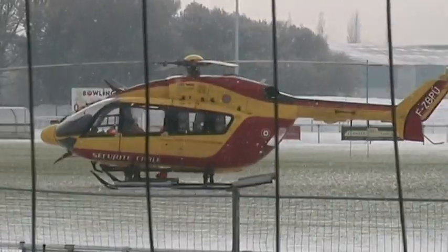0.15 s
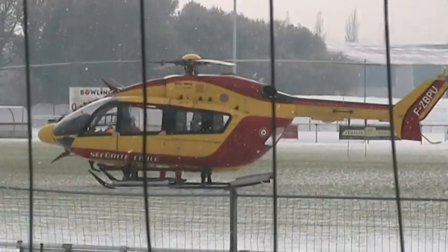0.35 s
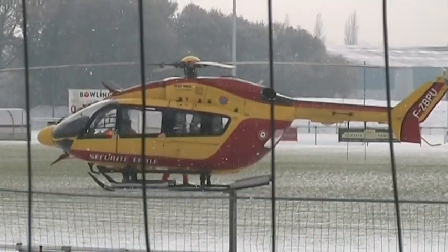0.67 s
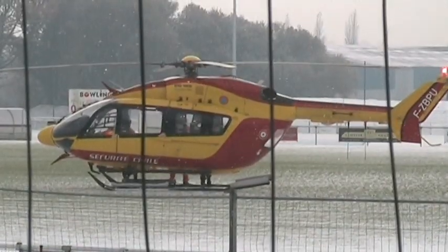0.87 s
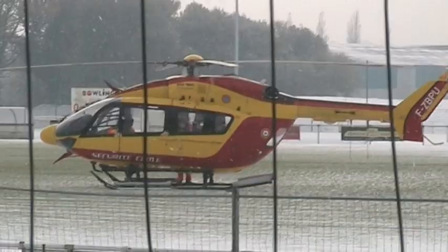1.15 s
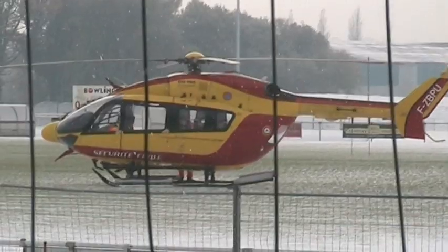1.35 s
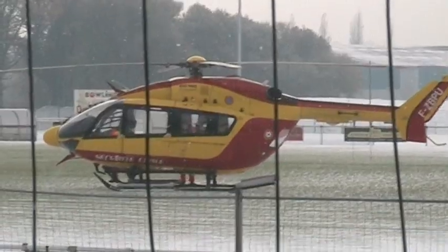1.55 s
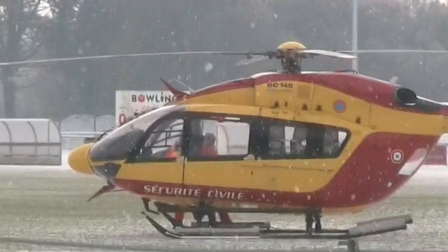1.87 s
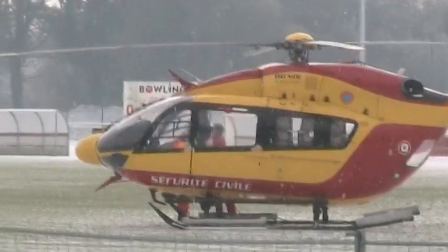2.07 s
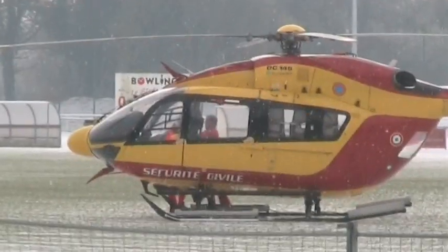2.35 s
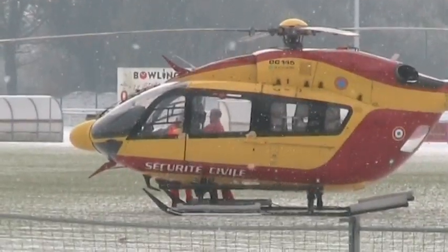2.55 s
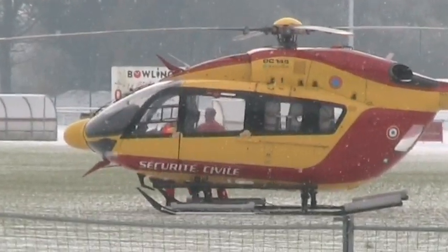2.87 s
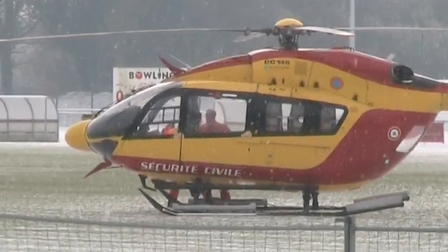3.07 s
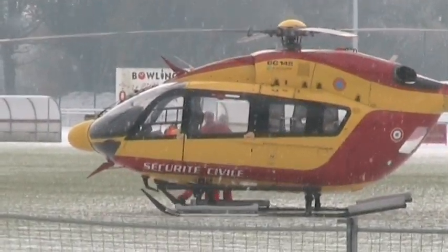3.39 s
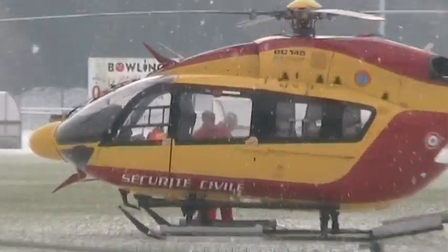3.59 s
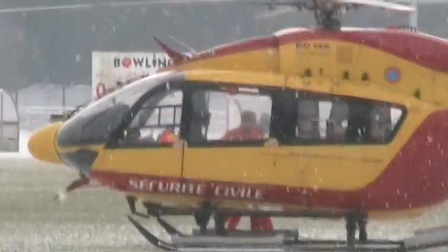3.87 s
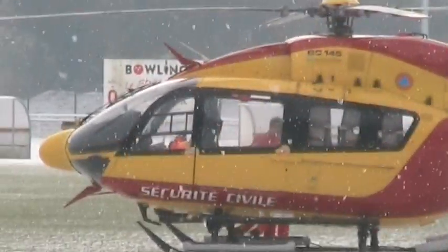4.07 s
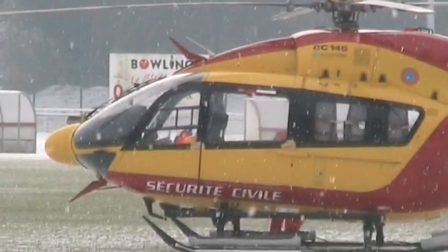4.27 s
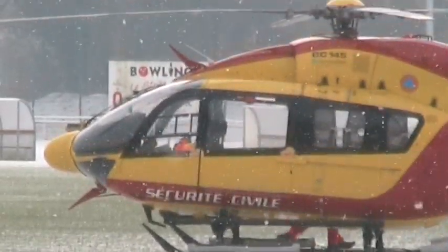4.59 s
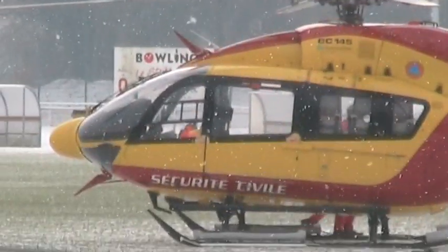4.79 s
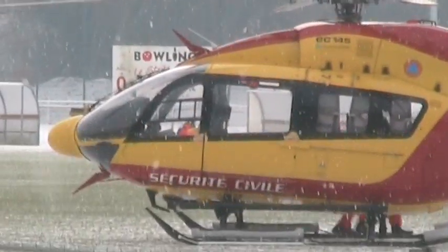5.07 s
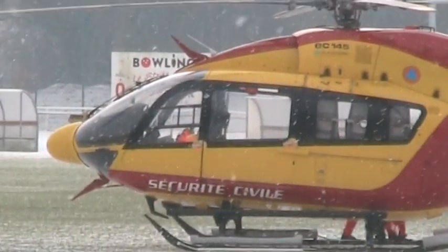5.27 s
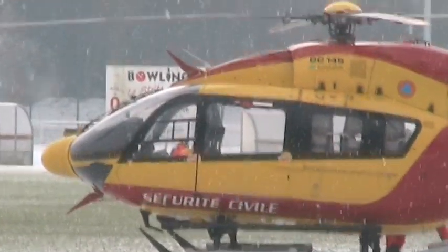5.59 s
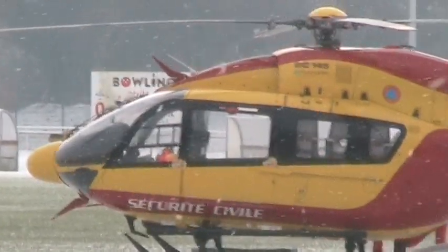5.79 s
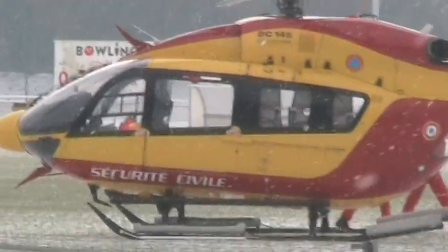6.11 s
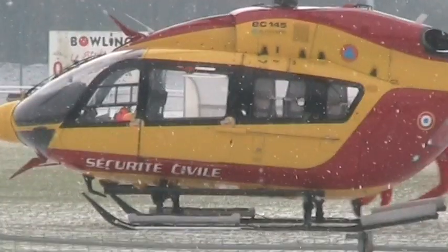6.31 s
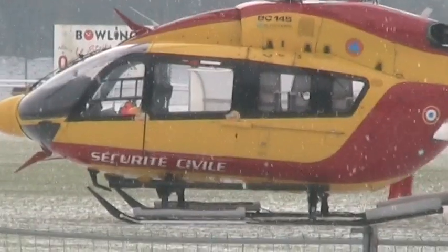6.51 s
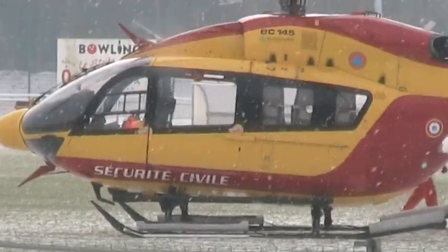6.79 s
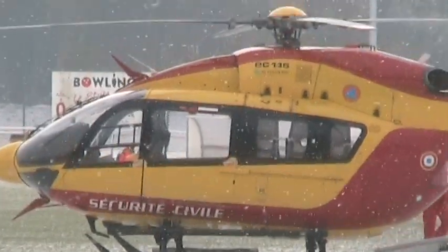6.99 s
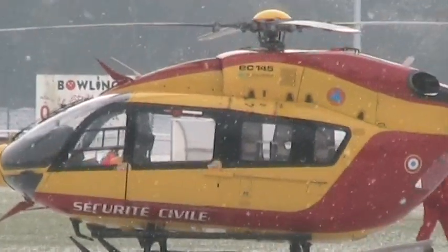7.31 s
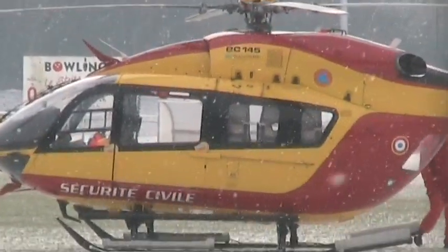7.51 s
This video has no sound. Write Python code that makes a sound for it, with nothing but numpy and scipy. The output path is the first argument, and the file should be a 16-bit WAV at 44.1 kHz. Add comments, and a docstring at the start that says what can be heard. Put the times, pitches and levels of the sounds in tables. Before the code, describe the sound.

Outdoors, an idling helicopter gives a low, growing tail-rotor hum with exhaust rush and a thin turbine whine, while a sharp knock and dry clicks come from the camera. Just before two seconds a hard cut drops the helicopter to faint; the tape camcorder's own buzz and surging high whistle come forward over a low steady hum, with a few soft knocks and rustles.

```python
"""A helicopter idles on a field, heard through a tape camcorder whose own mechanism is audible, in two shots.
First the tail rotor's harmonic hum swells over exhaust rush, filtered noise, and a thin whine of turbine
partials. At 1.744 s a hard cut makes the helicopter much fainter: the head drum's pulse-train buzz comes
forward over a low hum of sines, its whistle surging and sagging through a fixed resonance of changing strength.
Modal knocks, noise-burst clicks, one ping and soft bands of noise are scattered across both shots."""
import sys
import numpy as np
from scipy import signal
from scipy.fft import rfft, irfft, next_fast_len
from scipy.io import wavfile
from scipy.ndimage import uniform_filter1d

SR = 44100
rng = np.random.default_rng(int(sys.argv[2]) if len(sys.argv) > 2 else 0)


def digitize_waveform(pressure):
    """Quantize a signal to 16-bit integers and store it at the path in sys.argv[1].

    Rows of a 2-D input are taken as channels; values are limited to [-1, 1].
    """
    field = np.atleast_2d(pressure).T
    bounded = np.clip(field, -1, 1)
    quanta = np.round(bounded * 32767).astype(np.int16)
    wavfile.write(sys.argv[1], SR, quanta)


N = 337365
TIME = np.arange(N) / SR
FREQS = np.maximum(np.arange(N // 2 + 1) * SR / N, 1)
CUT_S = 1.744  # where the wide shot gives way to the close one
HEAD_HZ = 300  # head contacts per second
TOP_HZ = 15200  # upper band limit


def undb(db):
    """Logarithmic level: decibels to amplitude gain."""
    return 10 ** (np.asarray(db) / 20)


def curves(rows):
    """Linear interpolation in time of each column of a control table."""
    seconds, *columns = np.transpose(rows)
    return [np.interp(TIME, seconds, column) for column in columns]


def spectra(rows, hz=FREQS):
    """Interpolation on a logarithmic frequency axis of each column of a table."""
    points, *columns = np.transpose(rows)
    return [np.interp(np.log(hz), np.log(points), column) for column in columns]


def colour(x, gain):
    """Linear filtering: every frequency is multiplied by its own gain."""
    size = next_fast_len(N)
    hz = np.arange(size // 2 + 1) * SR / size
    return irfft(rfft(x, size) * np.interp(hz, FREQS, gain), size)[:N]


def noise():
    """White noise of unit power per Hz."""
    return rng.standard_normal(N) * np.sqrt(SR / 2)


def walk(rate):
    """Slow random modulation: steps at the given rate in Hz, smoothed, with a spread near 1."""
    k = max(int(SR / rate), 1)
    held = np.repeat(rng.standard_normal(N // k + 2), k)
    steps = uniform_filter1d(held, k)
    return uniform_filter1d(steps, k)[:N] / np.std(steps)


def tone(hz, db, waver=0):
    """Phase modulation: a sine of given rms level and random start, its phase bent by waver in radians."""
    phase = 2 * np.pi * (np.cumsum(hz + np.zeros(N)) / SR + rng.random())
    return np.sqrt(2) * undb(db) * np.sin(phase + waver)


def decay(t, t60):
    """Exponential damping: 60 dB lost in t60 seconds."""
    return np.exp(-np.log(1000) * t / t60)


def burst(t, low_hz, high_hz, t60):
    """Damped band noise: a sharp start and an exponential decay."""
    edges = np.clip([low_hz, high_hz], 20, .45 * SR)
    band = signal.butter(4, edges, "band", fs=SR, output="sos")
    grit = signal.sosfilt(band, rng.standard_normal(len(t)))
    return grit / np.std(grit) * decay(t, t60)


def add(out, x, s, db, pan_db):
    """Superposition: a short sound is mixed in at its time, level and side."""
    start = int(s * SR)
    sides_db = np.array([[pan_db], [-pan_db]]) / 2
    out[:, start:start + len(x)] += x * undb(db + sides_db)


def place(x, pan_db, lead_ms):
    """Stereo localisation: a level and an arrival-time difference, left relative to right."""
    late = np.interp(TIME - lead_ms / 1000, TIME, x)
    return np.array([x * undb(pan_db / 2), late * undb(-pan_db / 2)])


# Exhaust rush and open air. Each row: frequency in Hz, spectral level common to both ears in dB,
# spectral level differing between the ears in dB, both before swell and trim.
RUSH_WIDE = [(20, -88, -82), (55, -72.5, -68), (108, -61.5, -63), (286, -66, -66.5), (423, -71, -77.5),
             (1115, -69.5, -77.5), (1830, -69, -89), (2520, -73, -96), (2970, -71.5, -94),
             (3950, -75.5, -87), (4400, -81.5, -106), (5200, -85, -101), (9050, -108, -108),
             (12800, -125, -125)]
RUSH_CLOSE = [(18, -95, -93), (49.7, -68.5, -65), (100, -69.5, -64), (261, -71, -71), (310, -77, -73.5),
              (363, -71, -75), (435, -77, -77.5), (828, -74.5, -85.5), (880, -82, -83.5),
              (1310, -78.5, -85), (2400, -86, -92), (3550, -86.5, -81), (7960, -108, -108),
              (10800, -125, -125)]


def rush(table, swell_db, flutter_db):
    """Turbulence noise: exhaust straight ahead flutters in the downwash, within diffuse outdoor noise."""
    mid_db, side_db = spectra(table)
    strength = undb(swell_db - np.mean(swell_db) + flutter_db * walk(25))
    jet = colour(noise(), undb(mid_db)) * strength
    air = colour(noise(), undb(side_db))
    return np.array([jet + air, jet - air])  # opposite signs make the air diffuse


def low_hum(partials, lead_ms):
    """Superposition of low, nearly steady sines, a little stronger on the right and earlier on the left."""
    return place(partials, pan_db=-2.0, lead_ms=lead_ms)


# Soft rustles, rumbles and thin squeaks, and a low thump as the scene changes at 1.75 s. Each row: centre time
# in seconds, spread in seconds, # peak level in dB per Hz, centre frequency in Hz, width in Hz.
SWISHES = [(1.32, 0.075, -85, 6100, 497), (1.70, 0.058, -60, 290, 170), (1.75, 0.018, -58, 35, 30),
           (1.757, .014, -69, 520, 420), (4.35, .22, -68, 5622, 10), (4.85, 0.073, -75, 640, 160),
           (5.1, .15, -68, 38, 15), (5.55, .06, -70, 720, 120), (6.0, 0.28, -69, 45, 20),
           (6.2, .16, -73.5, 650, 200), (6.78, .12, -78, 4630, 80), (6.9, .22, -64, 5700, 10),
           (7.40, .025, -80, 4100, 600), (7.41, .03, -76, 5400, 250), (7.44, .05, -60, 4045, 25),
           (7.5, .06, -68, 5179, 16)]


def swishes():
    """Band-limited noise under a Gaussian envelope: each swish comes and goes."""
    total = 0
    for s, spread_s, db, hz, width_hz in SWISHES:
        band = colour(noise(), np.exp(-((FREQS - hz) / width_hz) ** 2))
        total = total + band * undb(db) * np.exp(-((TIME - s) / spread_s) ** 2)
    return total


# Dry clicks, and a broad snap as the scene changes at 1.7425 s. Each row: start in seconds, level in dB, low
# edge in Hz, high edge in Hz, # t60 in seconds, left minus right in dB.
CLICKS = [(0.0844, -24.5, 2600, 4400, 0.025, -2), (0.2505, -27, 2950, 3300, 0.033, -2),
          (0.675, -37, 4700, 6650, 0.022, 0), (0.959, -28, 3900, 4250, .022, -2),
          (1.7425, -34, 3000, 14000, 0.0051, -2), (2.2194, -36, 5100, 5700, .02, 0),
          (2.4508, -27.5, 5300, 6500, 0.024, 2), (3.6295, -32, 3350, 3900, .024, 0),
          (3.6300, -38, 4850, 5100, .025, 0)]
# Modes of the small part that pings. Each row: frequency in Hz, relative level in dB, t60 in seconds.
PING_MODES = [(3990, 0, 0.042), (5790, -16, .035), (6130, -14, 0.031)]
PING_S, PING_DB, PING_PAN_DB = 0.6748, -20, -5


def ticks(rise_s):
    """Impulsive excitation: dry clicks of damped noise, and one small hard part that rings in its modes."""
    out = np.zeros((2, N))
    t = TIME[:SR // 5]
    for s, db, low_hz, high_hz, t60, pan_db in CLICKS:
        add(out, burst(t, low_hz, high_hz, t60), s, db, pan_db)
    ping = sum(undb(db) * np.sin(2 * np.pi * hz * t) * decay(t, t60) for hz, db, t60 in PING_MODES)
    add(out, ping * (1 - np.exp(-t / rise_s)), PING_S, PING_DB, PING_PAN_DB)
    return out


# What the camera body rings with when knocked. Each row: frequency in Hz, relative level in dB, t60 in seconds.
BODY_MODES = [(470, -6, .025), (682, -3, 0.03), (945, -3.5, 0.023), (1290, -0.5, 0.025), (1570, -12, 0.021),
              (2120, -3, 0.016), (2800, -5, .016), (3950, 9, 0.021)]
# Handling knocks. Each row: start in seconds, level in dB, pitch the contact favours in Hz,
# spread in octaves, left minus right in dB.
KNOCKS = [(0.0847, -11.5, 1250, 0.97, -7.5), (0.0872, -24, 1400, 0.94, -1), (1.709, -21, 1300, 1.1, -3),
          (1.75, -16.5, 790, 0.64, 4), (3.474, -32, 1050, 0.56, 0), (3.6258, -23, 790, 0.6, 9),
          (3.6302, -24.5, 1200, 0.58, -2), (3.9724, -33, 850, 0.65, 0), (4.2104, -31.5, 890, 0.53, 0)]


def knocks(crack_db, crack_t60, rise_s):
    """Modal excitation: each knock rings the body's modes around the pitch its contact favours."""
    out = np.zeros((2, N))
    t = TIME[:SR // 5]
    for s, db, bright_hz, octaves, pan_db in KNOCKS:
        ring = 0
        for k, (hz, mode_db, t60) in enumerate(BODY_MODES):
            favour = np.exp(-(np.log2(hz / bright_hz) / octaves) ** 2)
            sign = (-1) ** k  # neighbouring modes start in opposition
            ring = ring + sign * undb(mode_db) * favour * np.sin(2 * np.pi * hz * t) * decay(t, t60)
        crack = burst(t, bright_hz / 2 ** octaves, bright_hz * 2 ** octaves, crack_t60)
        knock = (ring + undb(crack_db) * crack) * (1 - np.exp(-t / rise_s))
        add(out, knock, s, db, pan_db)
    return out


# Tape rubbing on the drum. Each row: frequency in Hz, wide-shot spectral level in dB,
# close-shot spectral level in dB, both before trim.
TAPE = [(1500, -104, -104), (3000, -93, -95), (4150, -88, -92), (4470, -87, -81.5), (5020, -96, -92),
        (5170, -99, -83.5), (6590, -80, -82), (7200, -90.5, -88.5), (8740, -87.5, -80), (9420, -88.5, -95),
        (10600, -94, -103), (11100, -91, -83), (11560, -108, -95), (12500, -112, -112), (14960, -108, -111)]


def tape_rub(db, slap_share, ring_share, count=2400):
    """Friction noise: hiss and a thicket of thin tones from the turning parts flare at each head contact."""
    gate = 1 + slap_share * np.exp(-(TIME * HEAD_HZ % 1) / 0.18)
    hiss = noise() * gate / np.sqrt(np.mean(gate ** 2))
    lines = np.zeros(len(FREQS), complex)
    where = (rng.uniform(2500, 12500, count) * N / SR).astype(int)
    lines[where] = rng.random(count) ** 3 * np.exp(2j * np.pi * rng.random(count))
    ring = irfft(lines, N)
    ring *= np.sqrt(SR / 2) / np.std(ring)  # as strong as the white noise
    rub = hiss + ring_share * ring * gate / np.mean(gate)
    return colour(rub, undb(db)) / np.hypot(1, ring_share)


# Bearing tones of the tape drive. Each row: frequency in Hz, wide-shot level in dB,
# close-shot level in dB, both before shimmer and trim.
BEARINGS = [(2326, -58, -69), (3025, -55.5, -72), (3578, -54, -65), (4024, -62, -58), (4058, -52, -56.5),
            (4470, -70, -66), (4590, -60, -66), (4630, -58, -65), (4651, -65, -60), (4670, -58, -70),
            (4828, -68, -59), (4949, -60, -65.5), (5300, -72, -72), (5257, -63, -54.5), (5316, -72, -60),
            (5374, -67, -56), (5570, -72, -66), (5560, -72, -60), (5600, -63, -59), (5800, -64, -65),
            (5813, -57, -66), (5890, -66, -58), (5880, -68, -66), (5938, -55, -62), (6163, -61, -57),
            (6130, -59, -57), (6230, -57, -59.5), (6357, -63, -67), (6360, -61, -62), (6500, -56, -62),
            (6610, -66, -58.5), (6707, -61, -67), (6748, -64, -60), (7698, -70, -60), (8000, -66, -60),
            (8200, -60, -52.5), (8140, -66, -56), (8300, -70, -66), (8390, -57, -52.5), (8480, -58, -52),
            (8630, -69, -64), (8870, -66, -58), (11500, -78, -62.5)]


def bearings(tones, shimmer_db, waver, count=14):
    """Common modulation and beating: tones of one shaft waver together, and close neighbours beat."""
    total = 0
    for k in range(count):
        shimmer = undb(shimmer_db * walk(9))
        bend = waver * walk(14)
        total = total + shimmer * sum(tone(hz, db, bend) for hz, db in tones[k::count])
    return total


# Head drum buzz. Each row: frequency in Hz, level of a harmonic there in dB before wander and trim.
BUZZ_WIDE = [(300, -53.5), (600, -47), (900, -68.5), (1800, -57), (2700, -52.5), (3000, -46), (3600, -50),
             (4200, -59), (4800, -47), (5100, -55.5), (5400, -49), (6600, -58.5), (7200, -65), (8400, -71),
             (11400, -84), (13000, -100)]
BUZZ_CLOSE = [(300, -96), (900, -68.5), (1800, -62), (2700, -57), (3000, -52), (3600, -52.5), (4200, -57),
              (4500, -46.5), (4800, -44.5), (5100, -46.5), (5400, -42), (5700, -54.5), (6600, -54),
              (7200, -65), (8400, -61), (9300, -80), (13000, -100)]


def head_buzz(table, uneven, scatter):
    """Periodic impulses: two heads slap the tape in turn, one harder, and each slap rings the body briefly."""
    period = SR // HEAD_HZ
    bins = np.maximum(np.arange(period // 2 + 1) * HEAD_HZ, 1)
    gain = undb(spectra(table, bins)[0])
    # minimum phase by the cepstrum: a sharp front, then the ring
    cepstrum = irfft(np.log(gain), period)
    cepstrum[period // 2 + 1:] = 0
    causal = np.exp(2j * rfft(cepstrum).imag)
    slap = irfft(gain * causal * (bins >= HEAD_HZ), period) * period / np.sqrt(2)
    turn = np.arange(N // period + 1)
    force = 1 + uneven * (-1) ** turn + scatter * rng.standard_normal(len(turn))
    return np.outer(force, slap).ravel()[:N] * undb(0.36 * walk(8))


def resonate(x, hz, width_hz, swell_db):
    """Resonance: one band of the camera body rings more and less strongly."""
    band = colour(x, np.exp(-((FREQS - hz) / width_hz) ** 2))
    return x + band * (undb(swell_db) - 1)


# Surges and sags of the drum's whistle. Each row: centre time in seconds, change in dB.
THROBS = [(1.77, -6), (1.95, 4), (2.09, -4), (2.22, 2), (3.15, -1.5), (4.05, 2), (4.23, -6), (4.36, 4),
          (4.51, -2), (4.8, -3), (5.42, -5), (6.1, -5), (6.75, -5.5), (6.92, 5), (7.07, -0.5), (7.22, 3.5),
          (7.42, -1), (7.6, 3)]
THROB_SPREAD_S = 0.065  # each one grows and dies away over this time


def throb_db():
    """Amplitude modulation: the whistle surges and sags briefly, with a small shimmer throughout."""
    surges = sum(db * np.exp(-((TIME - s) / THROB_SPREAD_S) ** 2) for s, db in THROBS)
    return surges + 0.26 * walk(5.7) + 0.64 * walk(40)


# How the body carries sound to the two ports. Each row: frequency in Hz, left minus right in dB,
# phase by which the left leads in radians.
PORTS_WIDE = [(300, 9, 3.5), (613, 3, 2.2), (1200, 20, 0.5), (2750, -2, -1), (4460, -12, 0.5),
              (4680, 4, -1), (5380, 1, -0.5), (5470, 7, -2.5), (7400, -2.5, -2.5), (8500, 3.5, -2.5),
              (12300, -1.5, -3)]
PORTS_CLOSE = [(300, 0, -2.5), (2260, 2.5, 0.56), (4020, 4.5, -1), (4740, 3.5, -1.4), (5360, 5.5, -1),
               (5800, 6.5, -2), (7540, 3.5, -2.5), (8900, 5, -3), (10350, 5.5, -3), (11500, -0.5, -3),
               (11260, -0.5, -2.5), (11800, 1, -3)]


def through_body(x, ports):
    """Structure-borne transmission: the two ports shake unequally, in the treble often near opposition."""
    pan_db, lead = spectra(ports)
    left = colour(x, undb(pan_db / 2))
    right = colour(x, undb(-pan_db / 2) * np.exp(-1j * lead))
    return np.array([left, right])


WIDE_THROB_HZ, WIDE_THROB_DB, WIDE_THROB_S = 3.7, 2.5, 0.2  # rate, swing either way, first crest


def wide_drive():
    """Structure-borne drive noise: buzz, rub and bearings with an evenly beating resonance."""
    drive = head_buzz(BUZZ_WIDE, uneven=0.052, scatter=0.17)
    drive = drive + tape_rub(spectra(TAPE)[0] + 1.9, slap_share=0.52, ring_share=2.2)
    drive = drive + bearings([(hz, db) for hz, db, _ in BEARINGS], shimmer_db=2.0, waver=0.18)
    beat_db = WIDE_THROB_DB * np.cos(2 * np.pi * WIDE_THROB_HZ * (TIME - WIDE_THROB_S))
    drive = resonate(drive, hz=5400, width_hz=73, swell_db=0.7 + beat_db)
    return through_body(drive, PORTS_WIDE) * undb(-0.5)


# Sizzle of the drive near 8 kHz. Each row: time in seconds, level in dB, of which only the changes count.
SIZZLE = [(1.8, -55.5), (2.15, -59.5), (2.8, -55.5), (3.72, -60), (4.27, -54.5), (4.87, -58), (5.0, -52.5),
          (6.06, -57.5), (6.63, -53), (7.52, -57), (7.55, -62), (7.6, -57)]
DRIVE_FADE_DB_PER_S = 0.33  # the tape drive settles after the cut


def close_drive():
    """Structure-borne drive noise: buzz, rub and bearings, with a changing sizzle and a surging whistle."""
    drive = head_buzz(BUZZ_CLOSE, uneven=0.02, scatter=0.068)
    drive = drive + tape_rub(spectra(TAPE)[1] + 0.29, slap_share=0.31, ring_share=3.1)
    drive = drive + bearings([(hz, db) for hz, _, db in BEARINGS], shimmer_db=1.6, waver=0.19)
    sizzle_db = curves(SIZZLE)[0]
    drive = resonate(drive, hz=8250, width_hz=650, swell_db=0.9 * (sizzle_db - np.mean(sizzle_db)))
    drive = resonate(drive, hz=5400, width_hz=22, swell_db=1.0 + throb_db())
    drive = drive * undb(0.76 - DRIVE_FADE_DB_PER_S * (TIME - CUT_S))
    return through_body(drive, PORTS_CLOSE)


# Turbine partials. Each row: frequency in Hz, relative level in dB.
TURBINE = [(3128, -20), (3505, -12.5), (3725, -9), (3822, 2), (4028, -10), (4048, -11), (4091, -21)]


def turbine(db, shimmer_db, waver):
    """Scintillation: a few thin partials shimmer in level and phase on their way across the field."""
    partials = 0
    for hz, partial_db in TURBINE:
        level_db = db + partial_db + shimmer_db * walk(30)
        partials = partials + tone(hz, level_db, waver * walk(25.56))
    return partials


def main_rotor(blade_hz, db, thump_hz, width_hz):
    """Blade-passing impulses: each passing blade gives a soft, low thump."""
    since_s = ((TIME * blade_hz) % 1 - .5) / blade_hz
    envelope = np.exp(-(np.pi * width_hz * since_s) ** 2)
    thumps = envelope * np.sin(2 * np.pi * thump_hz * since_s)
    return undb(db + 0.5 * walk(17)) * thumps / np.std(thumps)


# Tail rotor harmonics. Each row: multiple of the blade rate, relative level in dB.
TAIL_WIDE = [(1, -26), (2, 1), (3, -19), (4, -16.5), (5, -18.5)]
TAIL_CLOSE = [(1, -67), (2, -59), (3, -56), (5, -63), (6, -62.5)]


def tail_rotor(blade_hz, db, orders, unsteady_db):
    """Harmonic series of the blade-passing rate; moving air shakes each harmonic a little."""
    harmonics = 0
    for k, order_db in orders:
        level_db = db + order_db + unsteady_db * walk(16)
        harmonics = harmonics + tone(k * blade_hz, level_db, 0.08 * walk(17))
    return harmonics


# Growing hum of the tail rotor. Each row: time in seconds, reference level of its harmonics in dB.
HUM = [(0.0, -33), (0.094, -32.5), (0.36, -33.5), (0.6, -31.5), (0.83, -29), (1.15, -29.5), (1.28, -27),
       (1.408, -25.5), (1.72, -29)]
# Turbine whine across the field. Each row: time in seconds, reference level of its partials in dB.
WHINE_WIDE = [(0.05, -41), (0.48, -45), (0.9, -43), (1.15, -39.5), (1.47, -36.5), (1.72, -41.5)]
TAIL_BLADE_HZ = 69.6  # the idling tail rotor holds its speed
HUM_RUSH_SHARE = 0.33  # dB of exhaust rush per dB of hum


def wide_shot():
    """Superposition led by the helicopter: the rush follows the hum's swell, the whine its own curve."""
    hum_db, whine_db = curves(HUM)[0], curves(WHINE_WIDE)[0]
    exhaust = rush(RUSH_WIDE, HUM_RUSH_SHARE * hum_db, flutter_db=0.63) * undb([[-1.7], [.1]])
    hum = low_hum(tone(75.5, -40.5 + .4 * walk(10.0)), lead_ms=2.5)
    whine = place(turbine(whine_db, shimmer_db=1.6, waver=.3), pan_db=-4.5, lead_ms=0)
    tail = tail_rotor(TAIL_BLADE_HZ, hum_db, TAIL_WIDE, unsteady_db=1.0)
    rotor = place(tail, pan_db=-0.8, lead_ms=0.68)
    return exhaust + hum + wide_drive() + whine + rotor


# Exhaust rush. Each row: time in seconds, level in dB, of which only the changes count.
RUSH_LEVEL = [(1.8, -51.5), (4.3, -51), (6.15, -50.5), (7.6, -51.5)]
# Turbine whine across the field. Each row: time in seconds, reference level of its partials in dB.
WHINE_CLOSE = [(1.78, -49.5), (2.45, -54.5), (2.9, -60), (3.9, -58), (4.15, -50.5), (4.6, -50), (5.0, -58),
               (5.8, -57), (6.5, -66), (6.75, -52), (7.15, -52), (7.35, -57), (7.6, -56)]


def close_shot():
    """Superposition led by the tape drive: it buzzes over a low hum, the helicopter faint."""
    rush_db, whine_db = curves(RUSH_LEVEL)[0], curves(WHINE_CLOSE)[0]
    exhaust = rush(RUSH_CLOSE, rush_db, flutter_db=0.92) * undb(-0.7)
    hum_partials = tone(75.3, -39.3 + 0.19 * walk(6), 0.065 * walk(6.9)) + tone(150.6, -57)
    hum = low_hum(hum_partials, lead_ms=1.84)
    whine = place(turbine(whine_db, shimmer_db=1.2, waver=.2), pan_db=4, lead_ms=.03)
    thumps = main_rotor(blade_hz=13.73, db=-54.5, thump_hz=231.5, width_hz=31)
    rotors = tail_rotor(68.5, 0, TAIL_CLOSE, unsteady_db=1.5) + thumps  # equal in both ears
    return exhaust + hum + close_drive() + whine + rotors


def scene():
    """Juxtaposition and superposition: two shots meet in a hard cut, marked by a snap and a low thump, with
    handling sounds over both."""
    handling = knocks(crack_db=-11.0, crack_t60=0.044, rise_s=0.00058)
    handling = handling + ticks(rise_s=0.00065) + swishes()
    return np.where(TIME < CUT_S, wide_shot(), close_shot()) + handling


def record(dry):
    """Band limitation: the camcorder cuts the top with a steep elliptic low-pass."""
    low_pass = signal.ellip(8, .2, 70, TOP_HZ, fs=SR, output="sos")
    return signal.sosfilt(low_pass, dry)


dry = scene()
out = record(dry)
digitize_waveform(out)
```